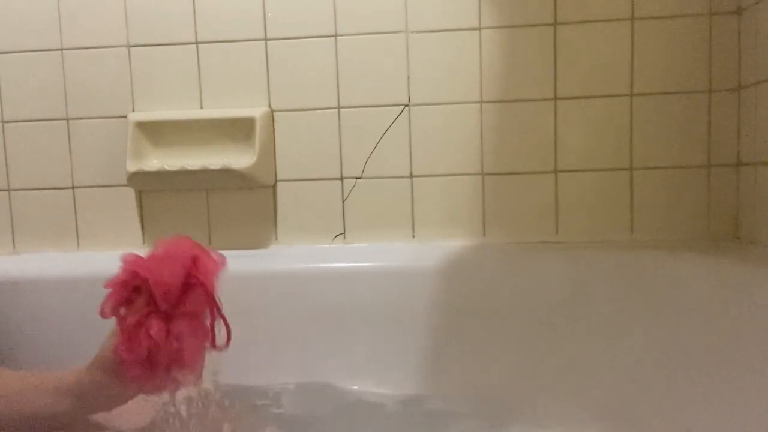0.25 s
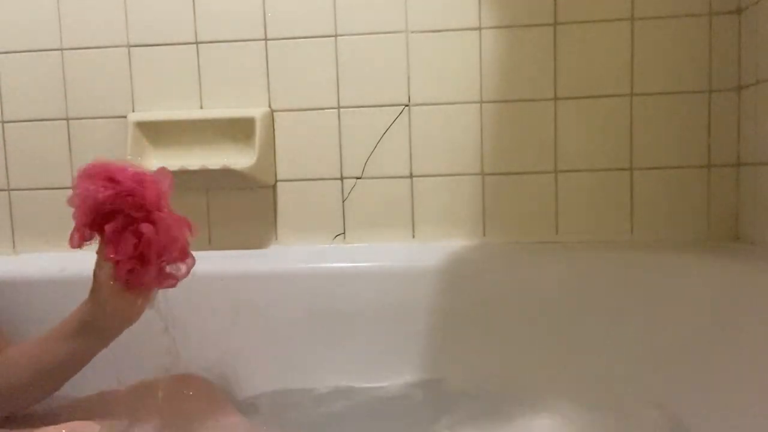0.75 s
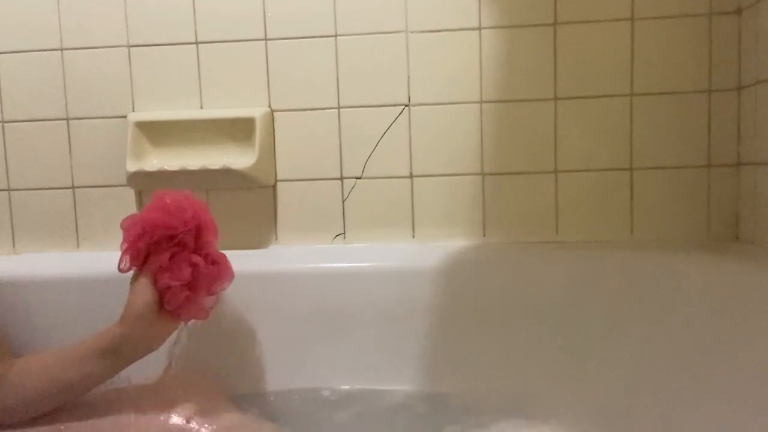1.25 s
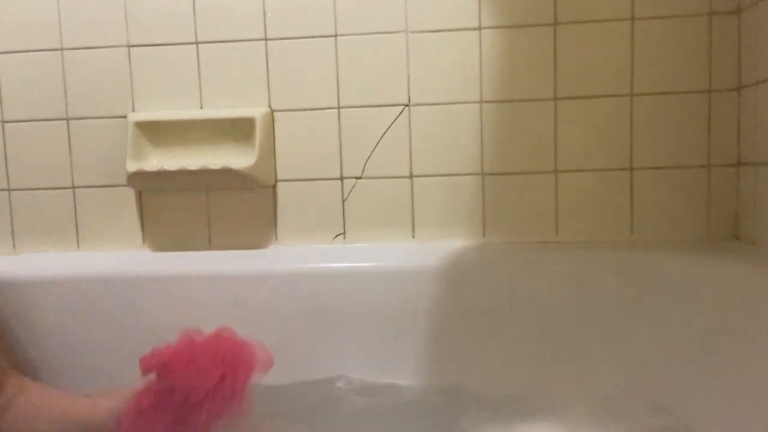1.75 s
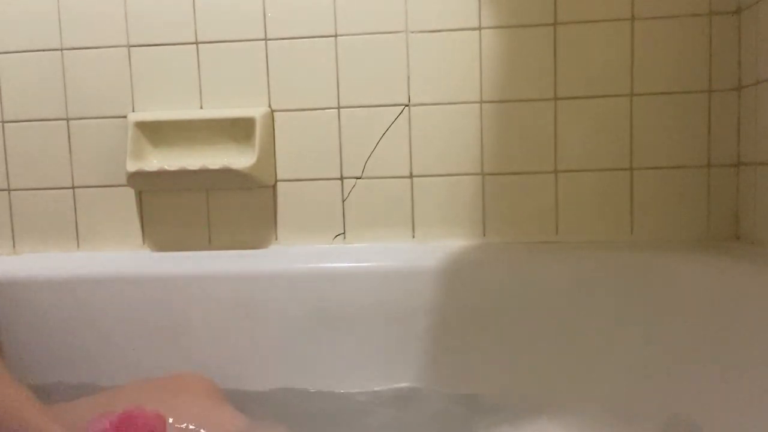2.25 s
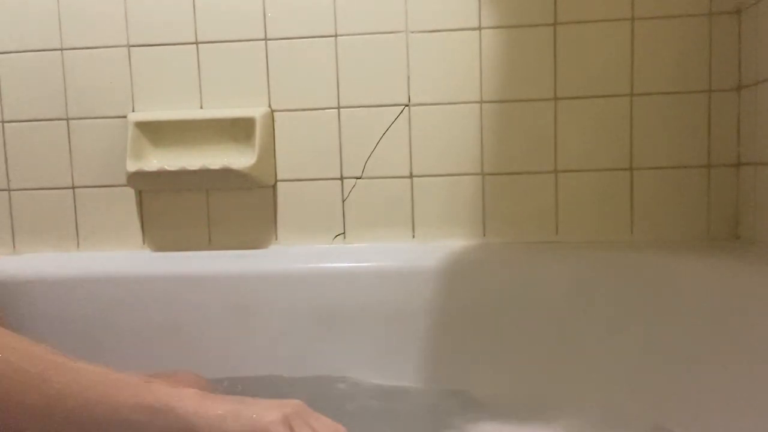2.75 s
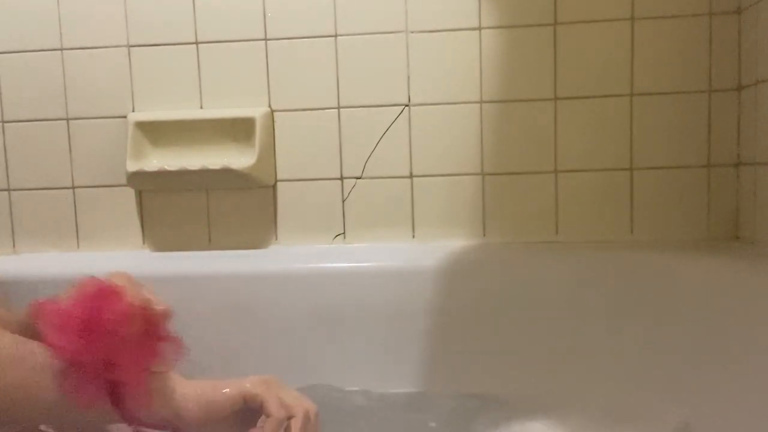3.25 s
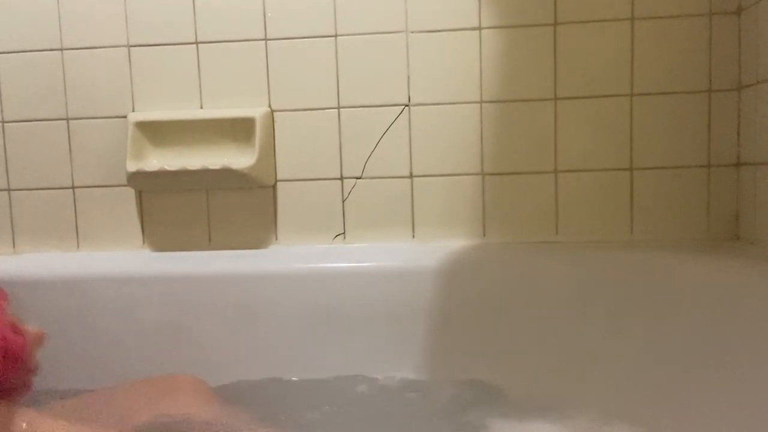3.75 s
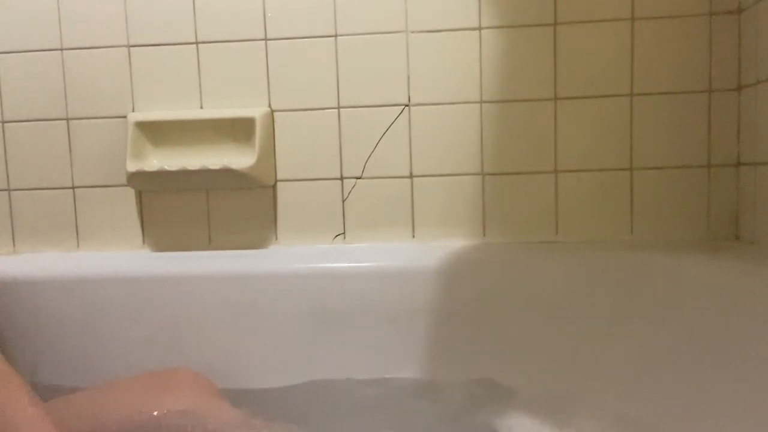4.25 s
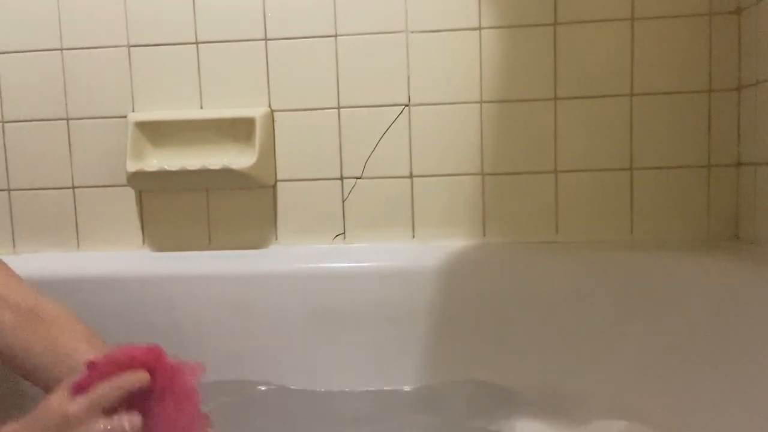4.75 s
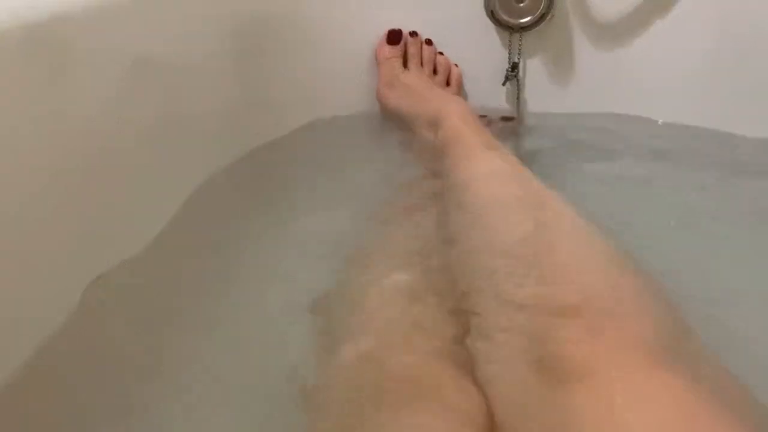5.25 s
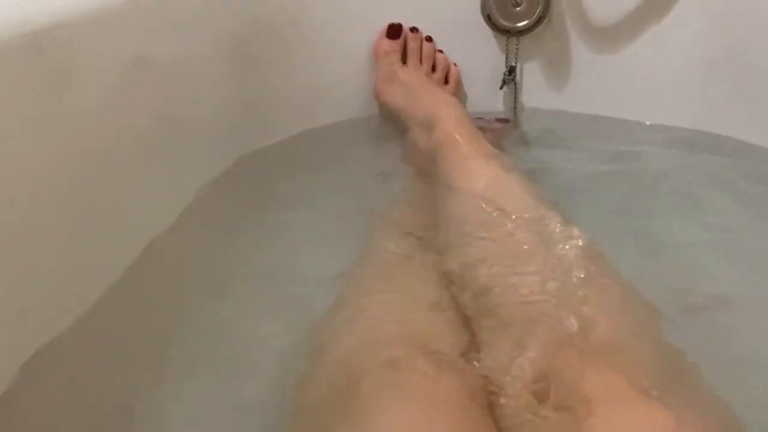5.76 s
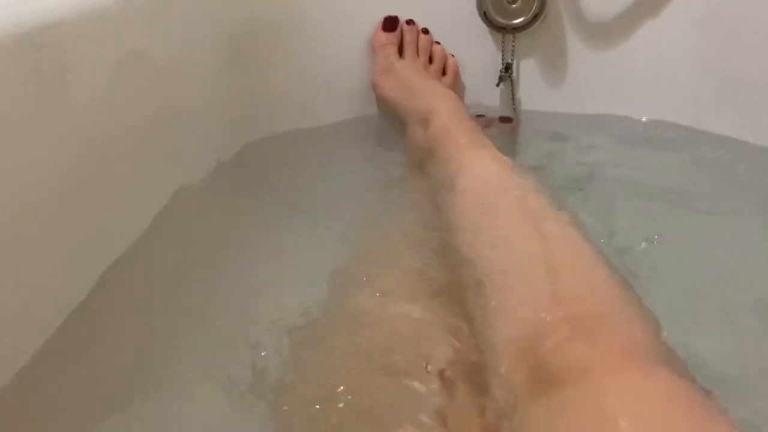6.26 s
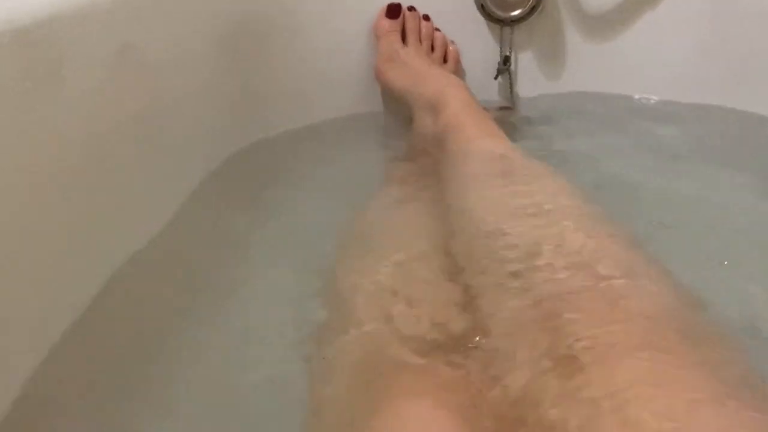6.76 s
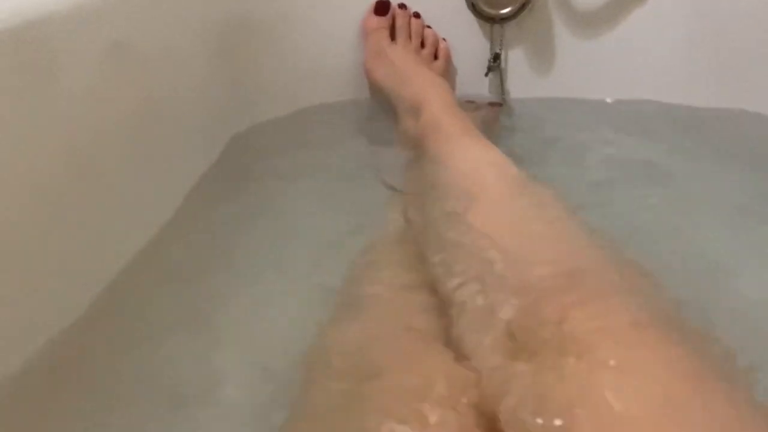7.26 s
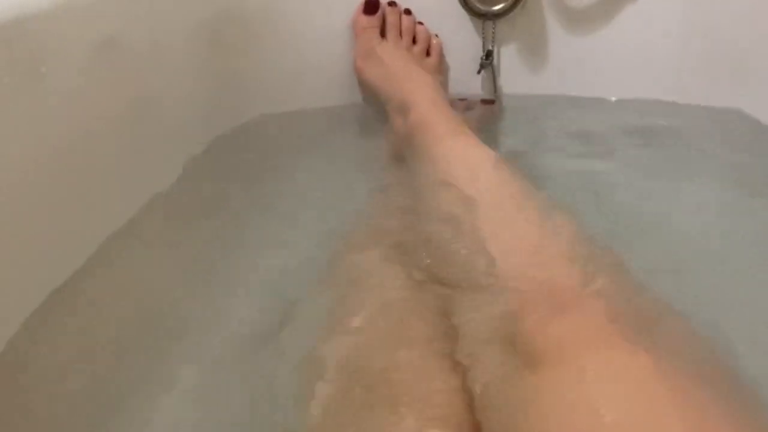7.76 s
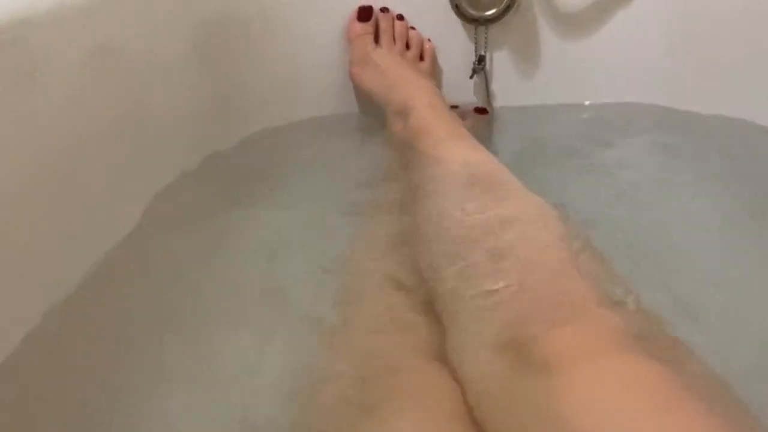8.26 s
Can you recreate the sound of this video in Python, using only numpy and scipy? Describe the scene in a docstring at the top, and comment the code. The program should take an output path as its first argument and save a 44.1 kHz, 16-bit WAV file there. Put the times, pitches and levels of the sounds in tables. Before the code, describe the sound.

A close, centred sound of washing in a filled tub, in a small tiled bathroom with short bright reflections. From 0 to 0.5 s water trickles and drips off a mesh sponge, then at 0.5-1.2 s it pours strongly with bubbly splashes, plinks and a low drumming on the tub. It thins to drips and small slaps by 1.5-2.2 s. At 2.4-3 s a fuller splash and renewed stream begin, running on with plops until a sharp splash near 4 s. Near quiet follows, with sparse drops, then a quick gurgling dunk at 4.8-5 s. A tiny silence at about 5.1 s. Afterwards, to 8.5 s, it is much softer and wider: legs swish the water gently, with isolated plops, small splashes near 5.9 and 7.1 s, rising bubble chirps, low rocking rumble and a steady faint fan-like whirr.

```python
"""Washing in a filled tub

In a small tiled bathroom, water runs from a mesh sponge as it is lifted, squeezed and dunked. Strokes splash
as clouds of ringing bubbles and clicking spray; pours drum on the tub as shaken resonances.
After a short silence the legs stir the water gently, with single plops (gliding, decaying sines)
over a rocking rumble and a steady fan-like whirr, both made of coloured noise."""
import sys
import numpy as np
from scipy import signal
from scipy.fft import rfft, irfft
from scipy.io import wavfile

SR = 44100
rng = np.random.default_rng(int(sys.argv[2]) if len(sys.argv) > 2 else 0)


def to_wav(s):
    """Save 16-bit WAV."""
    ch = np.atleast_2d(s).T  # columns
    pcm = np.round(np.clip(ch, -1, 1) * 32767)  # PCM
    wavfile.write(sys.argv[1], SR, pcm.astype(np.int16))


N = 374850
TIME = np.arange(N) / SR
TOP_HZ = 15750


def undb(db):
    """Decibels to gain."""
    return 10 ** (np.asarray(db) / 20)


def unit(x):
    """Scale to rms 1."""
    return x / np.sqrt(np.mean(x ** 2))


def noise():
    """White noise over the whole scene."""
    return rng.standard_normal(N)


def gain_curve(table):
    """Gain over time from (s, dB) points, joined by lines in dB."""
    s, db = np.transpose(table)
    return undb(np.interp(TIME, s, db))


def colour(x, points):
    """Shape a spectrum by (Hz, dB) points, joined on a log frequency axis; rms 1."""
    hz, db = np.transpose(points)
    f = np.fft.rfftfreq(N, 1 / SR)
    gain = undb(np.interp(np.log(f + 1), np.log(hz), db))
    return unit(irfft(rfft(x) * gain, N))


def band(x, lo_hz, hi_hz):
    """Causal band-pass."""
    return signal.sosfilt(signal.butter(2, [lo_hz, hi_hz], "band", fs=SR, output="sos"), x)


def resonances(modes):
    """Resonances of (Hz, width Hz, rms dB), each shaken by its own noise."""
    return sum(undb(db) * unit(band(noise(), hz - width / 2, hz + width / 2)) for hz, width, db in modes)


def add(out, s, sound):
    """Mix a sound in at a time."""
    i = max(int(s * SR), 0)
    out[i:i + len(sound)] += sound[:N - i]


def swell(s, length_s, attack_s, release_db_per_s):
    """Linear attack; exponential decay once the length has passed."""
    age = TIME - s
    return np.clip(age / attack_s, 0, 1) * undb(-release_db_per_s * np.maximum(age - length_s, 0))


# Near walls. Each row: delay in seconds, gain relative to the direct sound.
WALLS = [(.0029, 0.18), (.0047, 0.11), (0.0115, 0.11)]
# Standing waves between the tiles. Each row: frequency in Hz, relative level in dB.
STANDING = [(450, 33.5), (702, 11), (962, 28), (1033, 30), (1262, 24.5)]
STANDING_DB, STANDING_T60_S = -24.5, 0.28
ROOM_T60_S = 0.22


def bathroom(tail_db):
    """Tiled-room response: direct sound, near walls, standing waves and a random tail; unit energy."""
    t = TIME[:SR // 2]
    low = band(rng.standard_normal(len(t)), 76, 4400)
    high = band(rng.standard_normal(len(t)), 3220, 16000)
    tail = (low + high) * undb(-60 * t / ROOM_T60_S) * np.minimum(t / 0.0018, 1)
    ring = sum(undb(db) * np.cos(2 * np.pi * hz * t) for hz, db in STANDING)
    ring = ring * undb(-60 * t / STANDING_T60_S)
    late = tail / np.linalg.norm(tail) + undb(STANDING_DB) * ring / np.linalg.norm(ring)
    response = undb(tail_db) * late
    response[0] += 1
    for s, gain in WALLS:
        response[int(s * SR)] += gain
    return response / np.linalg.norm(response)


def in_room(x, tail_db):
    """A sound as it arrives from one spot in the tub, with a freshly drawn tail."""
    return signal.fftconvolve(x, bathroom(tail_db))[:N]


WANDER_HZ = 1.7  # rounds of the spots per second


def about_the_tub(x, tail_db, count=4):
    """The source wanders from spot to spot, so the room's colour keeps changing."""
    shares = [np.maximum(np.cos(2 * np.pi * (WANDER_HZ * TIME - k / count)), 0) for k in range(count)]
    return sum(in_room(x * share, tail_db) for share in shares)


# Colour of the still air. Each row: frequency in Hz, relative level in dB.
STILL_AIR = [(18, -50), (30, -38), (50, 6), (90, 0), (505, -0.5), (874, 5.5), (1330, -2), (2490, 4),
             (4660, -24), (5590, -50), (8950, -8.5), (15500, -3.5)]


def still_air():
    """Faint coloured noise of the room's air."""
    return undb(-62) * colour(noise(), STILL_AIR)


# Colour of the whirr. Each row: frequency in Hz, relative level in dB.
WHIRR = [(150, -25), (250, -8.5), (470, -9), (620, -7), (900, -2.5), (1600, -18), (2400, -7), (3400, -15.5),
         (4600, -17), (5400, -31), (11400, -17.5), (15500, -20.5)]
# Narrow resonances in the whirr. Each row: frequency in Hz, width in Hz, rms level in dB.
WHIRR_TONES = [(178.6, 3.5, -75), (585, 21, -75), (956, 13, -78), (1220, 190, -72), (1631, 97, -69.5),
               (1882, 61, -73.5)]
# Thin whine. Each row: frequency in Hz, rms level in dB before a common gain.
WHINE = [(3418, -85.5), (4037, -88), (4613, -87.5)]
WHINE_WIDTH_HZ, WHINE_GAIN_DB = 25, 2


def whirr():
    """Steady fan-like whirr: coloured noise, narrow resonances and a thin whine."""
    whine = resonances([(hz, WHINE_WIDTH_HZ, db) for hz, db in WHINE])
    return undb(-65.5) * colour(noise(), WHIRR) + resonances(WHIRR_TONES) + undb(WHINE_GAIN_DB) * whine


# Colour of the rumble. Each row: frequency in Hz, relative level in dB.
ROCK = [(25, -25), (60, -5.5), (90, 3.5), (120, 3), (145, -12.5), (185, -0.5), (280, -17.5), (330, -10),
        (500, -22.5), (900, -60)]


def rumble(rocking):
    """Bathwater rocking in the tub: low coloured noise that follows the motion."""
    return rocking * colour(noise(), ROCK)


# Tub shell resonances. Each row: frequency in Hz, width in Hz, relative level in dB.
TUB = [(63, 13.5, 2), (83, 14.6, 1), (117.4, 44, -8), (166, 15, -14), (259, 123, -5.5)]
# Water falling from a height. Each row: start in seconds, length in seconds, level in dB.
POURS = [(0, 0.34, -64), (0.58, 0.7, -54.5), (1.33, 0.45, -63), (2.645, 0.6, -64.5), (4.95, .12, -67)]
POUR_ATTACK_S, POUR_RELEASE_DB_PER_S = 0.0099, 130


def drumming():
    """Each pour shakes the resonances of the tub shell."""
    level = sum(undb(db) * swell(s, length_s, POUR_ATTACK_S, POUR_RELEASE_DB_PER_S)
                for s, length_s, db in POURS)
    return unit(resonances(TUB)) * level


def bubble(hz, t60, rise, swell_cycles=0.45, wobble=0):
    """A trapped bubble swells, rings down and climbs (octaves/s); it is gone after 1.5 octaves."""
    t = TIME[:int(t60 * SR) + 2]
    octaves = np.minimum(rise * t, 1.5)
    envelope = (1 - np.exp(-(hz * t / swell_cycles) ** 2)) * np.exp(-np.log(1000) * t / t60)
    alive = np.minimum(4 * (1.5 - octaves), 1)  # fades over the last quarter octave
    if wobble:
        octaves = octaves + wobble * unit(band(rng.standard_normal(2 * SR), *PLOP_WOBBLE_HZ))[-len(t):]
    return np.sin(2 * np.pi * np.cumsum(hz * 2 ** octaves) / SR) * envelope * alive


def bubbles(rate, lo_hz, hi_hz, cycles, spread_db, climb):
    """Bubbles of random size, rate per second; each rings some cycles and climbs up to climb octaves."""
    out = np.zeros(N)
    for when, size, loud, life, up in rng.random((int(rate * N / SR), 5)):
        hz = lo_hz * (hi_hz / lo_hz) ** size
        t60 = cycles * (.5 + life) / hz
        gain = undb(spread_db * loud ** 3) * np.sqrt(hz)  # mostly faint, a few strong
        add(out, when * TIME[-1], gain * bubble(hz, t60, up * climb / t60))
    return out


RIPPLE_TICK_DB = -9.5  # relative to the rocking


def ticks(rocking):
    """Tiny bubbles burst one by one on the rocking surface, heard from one spot."""
    pops = unit(bubbles(rate=34, lo_hz=1100, hi_hz=6500, cycles=28, spread_db=10, climb=0.25))
    return in_room(pops * undb(RIPPLE_TICK_DB) * rocking, tail_db=-1)


FLOW_DRIP_DB = -6  # relative to the flow


def drips(flow):
    """Stray drops plink as small bubbles at random while water runs."""
    plinks = unit(bubbles(rate=60, lo_hz=1308, hi_hz=4024, cycles=40, spread_db=10, climb=0.25))
    return about_the_tub(plinks * undb(FLOW_DRIP_DB) * flow, tail_db=6.5)


# Air pockets that open or close behind a stroke. Each row: start in seconds, length in seconds,
# starting Hz, final Hz, level in dB before the common trim.
GURGLES = [(0.56, 0.043, 2314, 1910, -32), (0.67, 0.046, 1194, 1360, -38), (0.866, 0.042, 720, 515, -39),
           (2.9, 0.033, 1985, 1290, -38.5), (2.971, 0.048, 1832, 1250, -36),
           (3.964, 0.055, 760, 627, -41.5), (4.622, 0.074, 883, 1245, -57),
           (4.828, 0.044, 1250, 2115, -30.5), (4.871, 0.04, 1355, 988, -30.5),
           (4.932, 0.038, 1351, 865, -32), (4.971, 0.022, 2765, 2040, -32), (6.636, 0.029, 1880, 2450, -48),
           (7.097, 0.052, 2470, 1575, -43.5), (7.105, .065, 1478, 1075, -39),
           (7.165, 0.041, 1250, 1110, -48)]
GURGLE_SHAKE_HZ = (18.6, 124)


def gurgles(trim_db):
    """A shaken air pocket: a rough resonance that glides as the pocket changes size."""
    out = np.zeros(N)
    for s, length_s, start_hz, final_hz, level_db in GURGLES:
        along = np.linspace(0, 1, int(length_s * SR))
        phase = 2 * np.pi * np.cumsum(start_hz * (final_hz / start_hz) ** along) / SR
        shake = band(rng.standard_normal((2, SR // 2)), *GURGLE_SHAKE_HZ)[:, -len(along):]
        rough = unit(shake[0] * np.cos(phase) + shake[1] * np.sin(phase))
        ring = rough * np.sin(np.pi * along)
        add(out, s, undb(trim_db + level_db) * in_room(ring, tail_db=0))
    return out


# Drops and wavelets slapping the surface. Each row: start in seconds, peak in dB,
# midrange relative to that peak in dB; treble and midrange trims follow.
SLAPS = [(0.771, -32, -5), (1.0282, -29, 0), (1.1827, -23, -20), (1.478, -31.5, -2), (2.304, -26.5, -24),
         (2.592, -29, 3), (4.0235, -24.5, -5), (4.7813, -26.5, -12), (5.602, -51, -12), (5.674, -44, -11),
         (5.9664, -45, 7), (6.295, -48, -18), (6.347, -45.5, 0), (7.079, -38, -8), (7.092, -31.5, -5),
         (7.721, -45, -20), (8.301, -50, -14)]


def slaps(treble_trim_db, body_trim_db, t60, tail_db):
    """A slap is a short noise crack with a wet midrange body."""
    out, t = np.zeros(N), TIME[:SR // 20]
    envelope = np.minimum(t / 0.00042, 1) * np.exp(-np.log(1000) * t / t60)
    for s, peak_db, mid_db in SLAPS:
        crack = in_room(rng.standard_normal(len(t)) * envelope, tail_db)
        treble = band(crack, 4600, 12800)
        body = band(band(crack, 1600, 4000), 1600, 4000)
        for part, db in ((treble, treble_trim_db), (body, body_trim_db + mid_db)):
            add(out, s, undb(peak_db + db) * part / np.abs(part).max())
    return out


# Single bubbles and drops, from deep plops to tiny high plinks. Each row: start in seconds,
# starting Hz, peak in dB before the common trim, t60 in seconds (held to at least 5 ms).
PLOPS = [(.052, 3600, -31.5, 0.016), (0.082, 1530, -31, 0.084), (.11, 934, -34.5, 0.19),
         (.135, 2840, -30.5, 0.017), (0.34, 1670, -31.5, 0.024), (.425, 938, -33, 0.062),
         (0.522, 1310, -30, 0.036), (.633, 534, -26.5, 0.15), (.77, 2250, -26, 0.024),
         (0.774, 3760, -37, 0.0062), (.825, 2190, -18, 0.011), (.868, 3560, -30, 0.0066),
         (.874, 790, -24, 0.03), (.959, 3050, -29, 0.0096), (1.03, 426, -41, .05), (1.044, 458, -36, 0.048),
         (1.083, 1076, -30.5, .05), (1.09, 442, -42.5, 0.076), (1.182, 724, -30, 0.077),
         (1.199, 926, -27.5, 0.13), (1.241, 5190, -32.5, 0.0073), (1.255, 8800, -22.5, .005),
         (1.342, 2370, -31.5, 0.025), (1.474, 5750, -30.5, 0.011), (1.48, 870, -36, 0.092),
         (1.539, 4050, -34, 0.016), (1.618, 1376, -39.5, .03), (1.667, 5700, -39, 0.008),
         (1.701, 1426, -33, 0.02), (1.75, 1170, -40.5, 0.037), (1.928, 2300, -36.5, .02),
         (2.229, 2020, -19.5, 0.016), (2.271, 1270, -39, 0.074), (2.382, 1400, -39, 0.032),
         (2.463, 987, -25, 0.13), (2.668, 2540, -19.5, 0.012), (2.762, 618.6, -29, 0.25),
         (2.807, 1050, -14, 0.024), (3.023, 1018, -21, 0.066), (3.129, 3080, -31.5, 0.018),
         (3.263, 2003, -25.5, 0.028), (3.264, 1026, -35.5, 0.074), (3.3, 1470, -30, 0.01),
         (3.304, 1040, -36.5, 0.046), (3.357, 978, -34, 0.035), (3.388, 2720, -25, 0.015),
         (3.404, 2620, -29, .014), (3.54, 1510, -36.5, 0.019), (3.6, 667, -45, 0.14),
         (3.633, 1670, -26.5, 0.017), (3.704, 2500, -32, 0.024), (3.825, 1090, -24.5, 0.047),
         (3.956, 1065, -19, 0.084), (4.022, 1153, -20, 0.02), (4.166, 2190, -40.5, 0.013),
         (4.212, 1620, -43, 0.034), (4.398, 2150, -40, 0.046), (4.584, 2530, -42.5, 0.029),
         (4.777, 2850, -37, 0.013), (4.802, 1400, -40, 0.022), (4.814, 962, -22, 0.064),
         (4.888, 1850, -21, 0.018), (4.926, 913, -27.5, 0.03), (5.586, 4800, -37, .012),
         (5.678, 2090, -37, 0.014), (5.932, 1290, -43.5, 0.037), (5.968, 922, -33.5, 0.089),
         (5.999, 950, -34.5, 0.075), (6.371, 3060, -40.5, 0.013), (6.426, 3630, -48, .008),
         (6.536, 4100, -39.5, 0.0076), (6.545, 1830, -36.5, 0.031), (6.619, 2950, -37.5, 0.0091),
         (6.661, 1270, -35.5, 0.051), (6.735, 1020, -45, 0.045), (7.091, 1384, -26, 0.067),
         (7.201, 1910, -47, 0.046), (7.39, 774, -47.5, 0.14), (7.425, 3980, -33.5, 0.006),
         (7.587, 2600, -48, 0.016), (7.633, 5040, -38.5, 0.0042), (7.653, 1065, -38, 0.095),
         (7.801, 3550, -52, .008), (8.045, 1310, -53, .05), (8.092, 1620, -45.5, 0.03),
         (8.445, 2770, -46.5, 0.011)]
# Bubbles that shoot up to the surface. Columns as for the plops, then rise in octaves per second.
CHIRPS = [(.647, 640, -18.5, 0.016, 25), (0.652, 1048, -17, 0.12, 15), (6.348, 636, -38, 0.21, 7.2),
          (6.399, 865, -33, 0.98, 43), (7.29, 1093, -44.5, 0.13, 45), (7.477, 1407, -41, 0.072, 37),
          (7.505, 1665, -41, 0.067, 25)]
PLOP_RISE_OCTAVES_PER_S, PLOP_SWELL_CYCLES = 1.49, 1.19
PLOP_WOBBLE_OCTAVES, PLOP_WOBBLE_HZ = 0.029, (23, 139)  # running water jostles a ringing bubble
PLOP_DRY_DB_PER_OCTAVE = 2  # small bubbles stir the room less than a large one at 1 kHz
CHIRP_TAIL_DB = -2


def plops(flow, trim_db, tail_db):
    """Single bubbles, each with its own room, wobbling where water runs; little escapes below their pitch."""
    out = np.zeros(N)
    steady = [(*row, PLOP_RISE_OCTAVES_PER_S, tail_db - PLOP_DRY_DB_PER_OCTAVE * np.log2(row[1] / 1000))
              for row in PLOPS]
    sweeping = [(*row, CHIRP_TAIL_DB) for row in CHIRPS]
    wobble = PLOP_WOBBLE_OCTAVES * np.sqrt(flow / flow.max())
    for s, hz, peak_db, t60, rise, room_db in steady + sweeping:
        note = bubble(hz, max(t60, .005), rise, PLOP_SWELL_CYCLES, wobble[int(s * SR)])
        ring = in_room(band(note, hz / 2, TOP_HZ), room_db)
        add(out, s, undb(trim_db + peak_db) * ring / np.abs(ring).max())
    return out


def droplets(rate, spread_db):
    """Tiny impacts and bursting foam: many faint clicks, a few strong."""
    sizes = undb(spread_db * np.minimum(rng.standard_exponential(N), 5))
    return (rng.random(N) < rate / SR) * sizes * rng.choice([-1, 1], N)


def spurts(rate, fade_s, steady):
    """Each falling drop throws up its own short burst of spray; rms 1."""
    drops = 1. * (rng.random(N) < rate / SR)
    return unit(steady + signal.lfilter([1], [1, -np.exp(-1 / (fade_s * SR))], drops))


# Colours of big bubbles, churn, small bubbles and spray. Each row: frequency in Hz, relative level in dB.
GULP = [(300, -21), (430, -9), (540, -4), (690, -2.5), (850, 0.5), (1200, 11)]
CHURN = [(620, -47), (850, -10), (1050, 2), (1400, 2.5), (1900, 1.5), (2500, 1), (3500, 1)]
TRICKLE = [(1300, -25), (1900, -1.5), (2500, -1.5), (3400, -9), (5000, -17.5), (7000, -5)]
SPRAY = [(1760, -20), (3000, -3), (3370, -6), (4170, -8), (5090, -11.5), (7900, -9), (14900, -14.5),
         (15500, -14.5)]


def water(churn_gain, gulp_gain, spray_gain, trickle_gain):
    """Stirred water: gulps and low slosh of big bubbles, churn, a trickle of small ones, and spray."""
    gulp = colour(bubbles(rate=380, lo_hz=542, hi_hz=922, cycles=27.3, spread_db=16, climb=0.64), GULP)
    deep = unit(bubbles(rate=160, lo_hz=397, hi_hz=573, cycles=31, spread_db=16, climb=0.15))
    slosh = unit(band(noise(), 165, 274))
    churn = colour(bubbles(rate=1300, lo_hz=729, hi_hz=2948, cycles=42, spread_db=21, climb=0.5), CHURN)
    trickle = bubbles(rate=950, lo_hz=1287, hi_hz=6045, cycles=40, spread_db=17, climb=0.47)
    trickle = colour(trickle, TRICKLE)
    fizz = unit(bubbles(rate=850, lo_hz=3775, hi_hz=14500, cycles=51, spread_db=27.5, climb=0.29))
    spray = colour(unit(droplets(rate=4500, spread_db=2.5)) + undb(-3.5) * fizz, SPRAY)
    # small bubbles lie between churn and spray in size, and follow both; running water adds more
    small_gain = np.hypot(undb(-1) * np.sqrt(churn_gain * spray_gain), trickle_gain)
    small = small_gain * trickle + spray_gain * spray
    # the more air a stroke traps, the lower its bubbles reach
    depth = gulp_gain / (np.hypot(gulp_gain, churn_gain) + 1e-9)
    low = gulp + depth * (undb(-10) * deep + undb(-21) * slosh)
    big = churn_gain * churn + gulp_gain * low
    spurting = small * spurts(rate=85, fade_s=0.0047, steady=0.9)
    return undb(-3) * (about_the_tub(big, tail_db=2.5) + about_the_tub(spurting, tail_db=-0.5))


# Strokes of sponge, hand or leg. Each row: start in seconds, length in seconds, churn in dB before
# the trim in water(), big bubbles relative to churn in dB, spray relative to churn in dB.
SPLASHES = [(0.394, 0.22, -41.5, -6.5, -28), (0.539, 0.15, -38, -0.5, -16), (0.745, 0.22, -41, -6.5, -3),
            (1.014, 0.041, -48.5, 5.5, 7), (1.139, 0.1, -59, 10.5, 2), (1.471, 0.025, -44, -7, -4.5),
            (1.737, 0.028, -53.5, -1.5, 8), (1.822, 0.072, -49.5, -34, 6), (2.185, 0.17, -53, -52, 0),
            (2.292, 0.018, -58, -20, 11.5), (2.399, 0.065, -35.5, -27, -30), (2.417, 0.07, -35, -0.5, -9.5),
            (2.523, 0.14, -38, -4, -27), (2.759, 0.066, -33, -9.5, -27), (2.831, 0.063, -52, -20, 13),
            (2.948, 0.05, -49, -26, -3), (3.23, 0.015, -47, -29, 9.5), (3.79, 0.097, -43.5, -18, -4),
            (3.935, 0.034, -36.5, -11, -3.5), (4.003, 0.024, -30.5, -12.5, -3.5),
            (4.135, 0.12, -59.5, 1.5, -1), (4.285, 0.09, -71, 8, 18.5), (4.765, 0.044, -59, -29, 13.5),
            (4.803, 0.051, -41, -29, -9), (4.827, 0.043, -35, -24, 0.5), (4.911, 0.11, -45, -8, 0.5),
            (5.553, 0.04, -71, -12, 16.5), (5.941, 0.031, -47.5, -4.5, -22), (6.33, 0.13, -70, 10.5, 3),
            (6.522, 0.046, -54, -30, -5.5), (6.63, 0.1, -61, -14, -8.5), (7.07, 0.049, -48, -10, 0),
            (7.4, 0.097, -65.5, 2, -2.5)]
SPLASH_ATTACK_S, SPLASH_RELEASE_DB_PER_S = 0.025, 267


def splashing():
    """Strength of churn, big bubbles and spray over time, summed in power over all strokes."""
    power = np.zeros((3, N))
    for s, length_s, db, gulp_db, spray_db in SPLASHES:
        gains = undb([db, db + gulp_db, db + spray_db])
        stroke = swell(s, length_s, SPLASH_ATTACK_S, SPLASH_RELEASE_DB_PER_S)
        power += np.outer(gains, stroke) ** 2
    return np.sqrt(power)


FLOW_CHURN_DB, FLOW_GULP_DB, FLOW_TRICKLE_DB = -10, -14.5, -14.5  # relative to the flow
RIPPLE_CHURN_DB, RIPPLE_SPRAY_DB = -24, -18.5  # relative to the rocking


def bathwater(flow, rocking):
    """The sponge's flow, the ripples and the strokes all stir the same water."""
    churn, gulp, spray = splashing()
    return water(churn_gain=np.hypot(churn, undb(FLOW_CHURN_DB) * flow + undb(RIPPLE_CHURN_DB) * rocking),
                 gulp_gain=np.hypot(gulp, undb(FLOW_GULP_DB) * flow),
                 spray_gain=np.hypot(spray, flow + undb(RIPPLE_SPRAY_DB) * rocking),
                 trickle_gain=undb(FLOW_TRICKLE_DB) * flow)


# Water running off the sponge. Each row: time in seconds, flow level in dB.
FLOW = [(0, -51), (.15, -49.5), (.28, -56.5), (.54, -43.5), (1.2, -48), (1.42, -55.5), (1.58, -52.5),
        (1.68, -59.5), (1.9, -50.5), (2.16, -63.5), (2.5, -43.5), (3.25, -45), (3.7, -48), (4.0, -49.5),
        (4.17, -66), (4.5, -66), (5.06, -79)]
# Bathwater rocking as the legs move. Each row: time in seconds, rocking level in dB.
ROCKING = [(5.11, -55.5), (6.3, -61.5), (6.65, -60), (7.3, -56), (8.1, -70.5), (8.5, -67)]
BREAK_START_S, BREAK_END_S = 5.062, 5.108
STIR_FADE_IN_S = 0.67  # water sounds fade in after the break, keeping the earlier splash's tail out


def scene():
    """Sponge dead centre, a silent break, then the legs with some stereo width."""
    first, second = TIME < BREAK_START_S, TIME > BREAK_END_S
    flow, rocking = first * gain_curve(FLOW), second * gain_curve(ROCKING)
    wet = bathwater(flow, rocking) + drips(flow) + ticks(rocking) + gurgles(trim_db=-3)
    wet = wet + plops(flow, trim_db=-3.5, tail_db=2)
    wet = wet + slaps(treble_trim_db=-1.5, body_trim_db=-3.5, t60=0.012, tail_db=-4)
    stirring = wet * np.clip((TIME - BREAK_END_S) / STIR_FADE_IN_S, 0, 1) ** 2
    washing = wet + drumming() + still_air()
    mid = first * washing + second * (stirring + whirr() + rumble(rocking))
    # the ears differ in phase, in the reflections they get and in freshly drawn noise
    reflections = np.roll(in_room(stirring, 0.45), int(WALLS[0][0] * SR))
    quadrature = signal.hilbert(stirring).imag
    side = undb(-7) * reflections - undb(-10) * quadrature
    side = second * (side + undb(-3.5) * whirr() + undb(-14) * rumble(rocking))
    return np.array([mid + side, mid - side])


def record(dry):
    """The phone cuts the top: a steep elliptic low-pass."""
    return signal.sosfilt(signal.ellip(10, .2, 70, TOP_HZ, fs=SR, output="sos"), dry)


dry = scene()
out = record(dry)
to_wav(out)
```